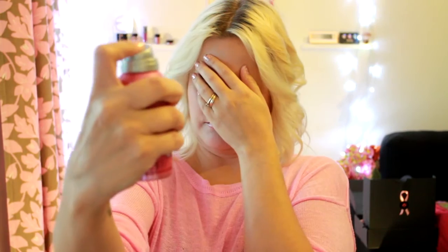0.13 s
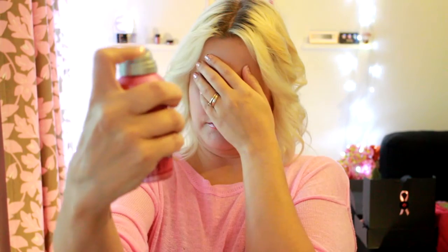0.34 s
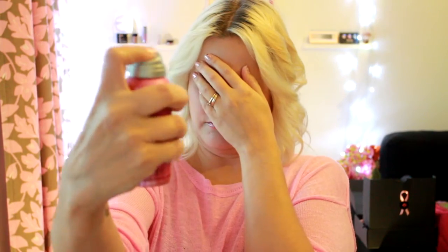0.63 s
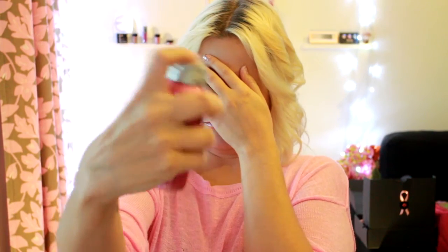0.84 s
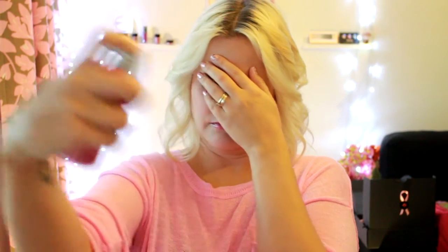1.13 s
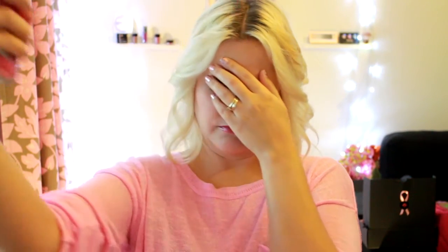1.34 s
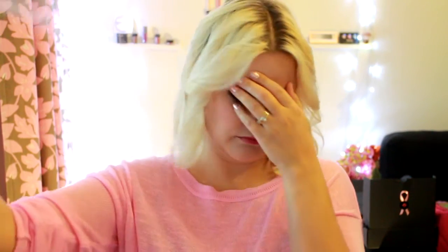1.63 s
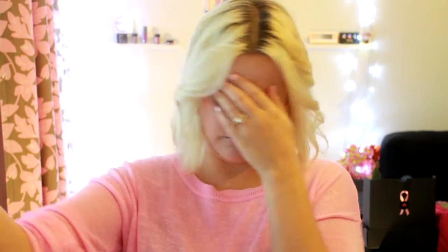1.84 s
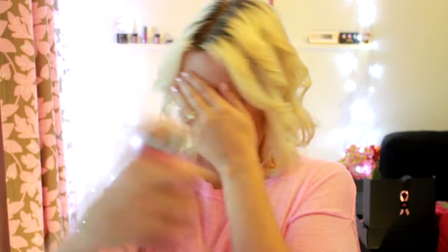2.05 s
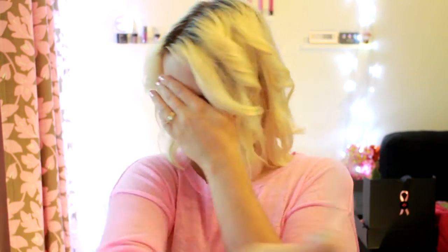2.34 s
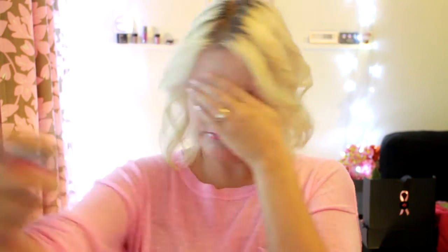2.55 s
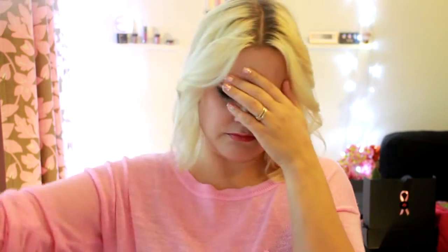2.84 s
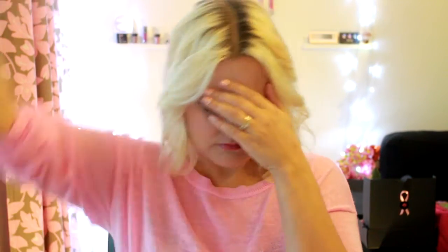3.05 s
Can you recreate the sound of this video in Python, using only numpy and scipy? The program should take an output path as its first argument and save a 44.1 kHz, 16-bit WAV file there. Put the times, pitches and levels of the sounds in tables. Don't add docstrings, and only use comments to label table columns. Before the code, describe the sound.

Close, bright spray-can hiss in a small furnished room: one hard plastic snap, four short puffs, a brief gap, then a sustained spray; quiet fan air and faint low hum lie behind.

```python
import sys
import numpy as np
from scipy import signal
from scipy.fft import rfft, irfft, next_fast_len
from scipy.io import wavfile
from scipy.ndimage import uniform_filter1d, map_coordinates

SR = 44100
rng = np.random.default_rng(int(sys.argv[2]) if len(sys.argv) > 2 else 0)


def how_loud(loudness_db):
    steps = np.asarray(loudness_db, float) / 20
    return 10 ** steps


def digitize_waveform(pressure):
    field = np.atleast_2d(pressure).T
    bounded = np.clip(field, -1, 1)
    quanta = np.round(bounded * 32767).astype(np.int16)
    wavfile.write(sys.argv[1], SR, quanta)


N = 141120
SNAP_S = 0.22243


def unit(x):
    return x / np.sqrt(np.mean(x ** 2) + 1e-20)


def along(points, hz):
    f, v = np.transpose(points)
    return np.interp(np.log(hz + 1), np.log(f + 1), v)


def wobble(rate):
    knots = rng.standard_normal(int(N * rate / SR) + 4)
    return map_coordinates(knots, [np.arange(N) * rate / SR])


def filtered(x, response):
    m = next_fast_len(N + SR // 2)
    return irfft(rfft(x, m) * response(np.fft.rfftfreq(m, 1 / SR)), m)[..., :N]


def resonance(f, centre_hz, width_hz):
    return 1j * f * width_hz / (centre_hz ** 2 - f * f + 1j * f * width_hz)


def rush(gain, patchy_db):
    z = signal.stft(rng.standard_normal((2, N)), nperseg=512)[2]
    field = uniform_filter1d(rng.standard_normal(z.shape[1:]), 6, 0)
    field = uniform_filter1d(field, 12, 1)
    noise = signal.istft(z * how_loud(patchy_db * unit(field)), nperseg=512)[1][:, :N]
    return unit(filtered(noise, gain))


def ports(pair, side_db, lean):
    # frequency in Hz, share of the mid.
    imbalance = [(250, -.04), (700, -0.13), (1300, -0.12), (2400, 0.031), (4400, 0.079), (8100, .12),
                 (11000, 0.24), (14000, .02)]
    side = filtered(pair[1], lambda hz: how_loud(along(side_db, hz)))
    side = side - filtered(pair[0], lambda hz: lean * along(imbalance, hz))
    return np.array([pair[0] + side, pair[0] - side])


def spray():
    # frequency in Hz, level in dB per Hz.
    jet_color = [(1800, -13), (2300, -13.5), (4100, -8), (6500, -7), (9600, -0.5), (10800, -3),
                 (12000, -10.5), (15800, -13.5)]
    # frequency in Hz, level in dB per Hz.
    body_color = [(300, 2), (500, -2), (1100, -2.5), (1900, 1), (2300, -12), (4000, -41)]
    # frequency in Hz, side over mid in dB.
    spray_side = [(300, -17), (1400, -17), (3100, -14.5), (6500, -11), (9500, -10), (10900, -5),
                  (11600, 6.5), (15500, 3)]
    nozzle_hz, nozzle_width_hz, nozzle_db = 9450, 230, -17
    body_db, body_lag_s, wet_db = -11, 0.0033, -4

    sputter_db = 0.33 * wobble(6.46) + 0.99 * wobble(120)
    jet = rush(lambda hz: how_loud(along(jet_color, hz)), patchy_db=0.97)
    whistle = rush(lambda hz: resonance(hz, nozzle_hz, nozzle_width_hz), patchy_db=3.5)
    whistle = whistle * how_loud(nozzle_db + 3.1 * wobble(5.4))
    body = rush(lambda hz: how_loud(along(body_color, hz)), patchy_db=0.86) * how_loud(body_db)
    direct = how_loud(sputter_db) * (valve(0) * (jet + whistle) + valve(body_lag_s) * body)
    heard = direct + how_loud(wet_db) * room(direct)
    no_rumble = filtered(heard, lambda hz: np.clip(hz / 150 - 1, 0, 1))
    return ports(no_rumble, spray_side, lean=0.98)


def valve(lag_s):
    # opening in seconds, rise in seconds, start of closing in seconds,
    # level in dB at the start, level in dB at the end.
    presses = [
        (.223, 0.037, 0.4, -33, -37.5),
        (0.625, 0.024, .80, -35, -37.5),
        (1.205, .036, 1.363, -32.5, -40.5),
        (1.459, 0.036, 1.673, -36.5, -40.5),
        (2.22, 0.036, 2.947, -36.5, -37),
    ]
    crack_db, close_s = -18, 0.053
    t, flow = np.arange(N) / SR, np.zeros(N)
    for on, rise, off, start_db, end_db in presses:
        still_shut = np.clip(1 - (t - on - lag_s) / rise, 0, 1)
        opening = (t > on + lag_s) * how_loud(crack_db * still_shut ** 0.85)
        closing = np.clip(1 - (t - off) / close_s, 0, 1) ** 1.64
        flow += opening * closing * how_loud(np.interp(t, [on, off], [start_db, end_db]))
    return flow


def snap():
    # delay in seconds, level in dB.
    answers = [(0, 0), (.0012, -10), (.0022, -14), (.0035, -17), (.0058, -11), (.0063, -10), (.0076, -13),
               (.0084, -12), (.0093, -14), (.014, -17), (.022, -16)]
    # frequency in Hz, side over mid in dB.
    snap_side = [(500, -13), (2000, -9), (5000, -9.5), (9000, -10), (10900, 3), (11600, 5), (15500, 5)]
    scatter_s, scatter_t60_s, scatter_db, wet_db = 0.0056, 0.02, -10, -3.5

    blows = np.zeros((2, N))
    for delay, db in answers:
        blows[0, round((SNAP_S + delay) * SR)] += how_loud(db)
    first = blows[[0, 0]] * (np.arange(N) < (SNAP_S + 0.001) * SR)
    t = np.arange(SR // 20) / SR
    scatter = rng.standard_normal((2, len(t))) * how_loud(-60 * t / scatter_t60_s)
    scatter = how_loud(scatter_db) * scatter / np.linalg.norm(scatter[0])
    start = round((SNAP_S + scatter_s) * SR)
    blows[:, start:start + len(t)] += scatter
    return ports(filtered(blows + how_loud(wet_db) * room(first), cap), snap_side, lean=1)


def cap(f):
    # frequency in Hz, width in Hz, level in dB.
    resonances = [(453, 130, -16), (1010, 570, -5.5), (1746, 270, 3), (2560, 590, 2.5), (3990, 620, 2.5),
                  (5100, 830, -10), (7400, 890, 0.5), (9800, 1200, -5.5), (13500, 2300, -22)]
    snap_db = 13.5
    power = sum(how_loud(2 * db) * np.abs(resonance(f, c, w)) ** 2 for c, w, db in resonances)
    power = power * f ** 2 / (f ** 2 + 300 ** 2)
    cepstrum = irfft(np.log(power + 1e-8) / 2)
    cepstrum[1:len(f) - 1] *= 2
    cepstrum[len(f):] = 0
    return how_loud(snap_db) * np.exp(rfft(cepstrum))


def room(pair):
    # frequency in Hz, time to fall 60 dB in seconds.
    decay = [(300, 0.29), (1800, 0.47), (5000, 0.38), (10000, 0.28), (15000, 0.22)]
    wet = np.zeros((2, N + SR))
    step = 4410
    for i in range(0, N, step):
        piece = pair[:, i:i + step]
        if np.any(piece):
            hz, t, z = signal.stft(rng.standard_normal((2, SR // 3)), SR, nperseg=256)
            fade = how_loud(-60 * t / along(decay, hz)[:, None])
            tail = signal.istft(z * fade, SR, nperseg=256)[1]
            part = signal.fftconvolve(piece, tail / np.linalg.norm(tail[0]), axes=1)
            start = i + 260
            wet[:, start:start + part.shape[1]] += part
    return wet[:, :N]


def fan():
    # frequency in Hz, level in dB per Hz.
    fan_color = [(25, -26), (90, -21), (170, -14.5), (300, -7.5), (720, -8.5), (800, -12), (1500, -14),
                 (2600, -29.5), (4000, -82)]
    # frequency in Hz, width in Hz, lift in dB.
    room_modes = [(138, 14, 10), (193, 15, 6), (272, 14, 4.5), (326, 27, 7.5), (368.4, 10, 3), (500, 12, 7),
                  (720, 33, 3)]
    # frequency in Hz, side over mid in dB.
    fan_side = [(60, -1), (130, -1), (290, -10.5), (640, -7), (1410, -5), (3100, 4.5), (6820, 17),
                (15000, -3.5)]

    def color(hz):
        lift_db = sum(db * np.exp(-((hz - c) / w) ** 2) for c, w, db in room_modes)
        return how_loud(along(fan_color, hz) + lift_db)

    return ports(how_loud(-50) * rush(color, patchy_db=0.88), fan_side, lean=0.96)


def hum():
    hum_hz, width_hz, level_db, grows_db, flutter_share = 49, 9.3, -67.5, 5, 0.97
    t = np.arange(N) / SR
    mid, side = rush(lambda hz: resonance(hz, hum_hz, 2 * width_hz) ** 2, patchy_db=0.6)
    flutter = mid + 0.41 * side * np.array([[1], [-1]])
    tone = np.sin(2 * np.pi * hum_hz * t + 0.5 * wobble(4.5))
    swell = how_loud(level_db + grows_db * t / t[-1] + 1.1 * wobble(5))
    return (tone + flutter_share * flutter) * swell


def recorder_hiss():
    # frequency in Hz, level in dB per Hz.
    hiss_color = [(1200, -19), (2000, -3.5), (3200, -8), (5500, -12.5), (8500, -17), (11000, -16),
                  (12500, -14), (15800, -13)]
    hiss = rush(lambda hz: how_loud(along(hiss_color, hz)), patchy_db=0.3)
    return ports(how_loud(-62.5) * hiss, [(1000, 0.5)], lean=0.01)


def background():
    return fan() + recorder_hiss() + hum()


def scene():
    return spray() + snap() + background()


def band_limit(x):
    return signal.sosfilt(signal.butter(12, 17070, fs=SR, output="sos"), x)


def record(dry):
    ceiling, notch_hz, notch_width_hz, top_hz = 1.1, 11180, 170, 15750

    def band(hz):
        gap = 1 - resonance(hz, notch_hz, notch_width_hz)
        return gap * np.clip((top_hz - hz) / 120 + 0.5, 0, 1)

    rounded = dry / (1 + np.abs(dry / ceiling) ** 6) ** (1 / 6)
    return band_limit(filtered(rounded, band))


dry = scene()
out = record(dry)
digitize_waveform(out)
```